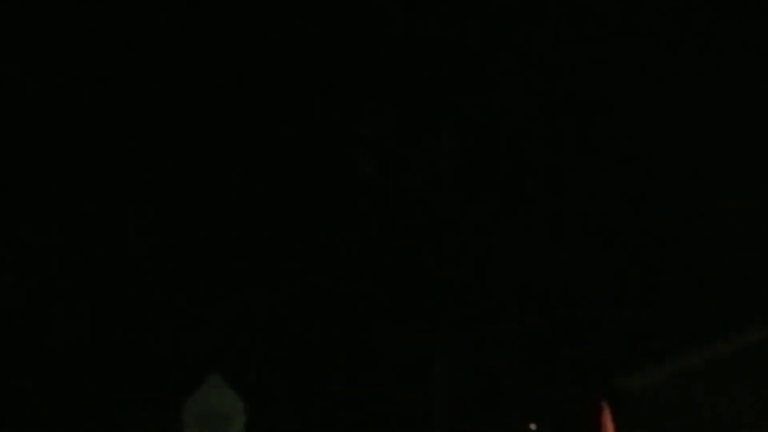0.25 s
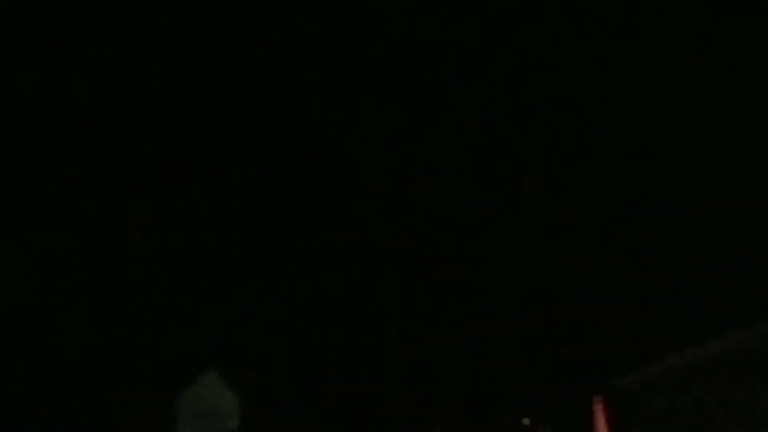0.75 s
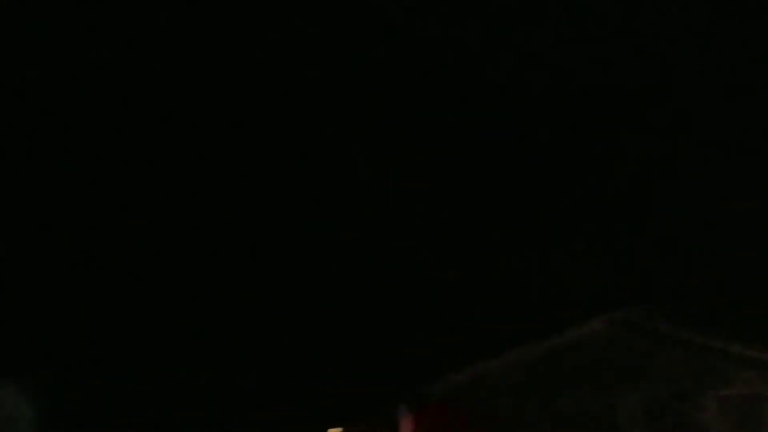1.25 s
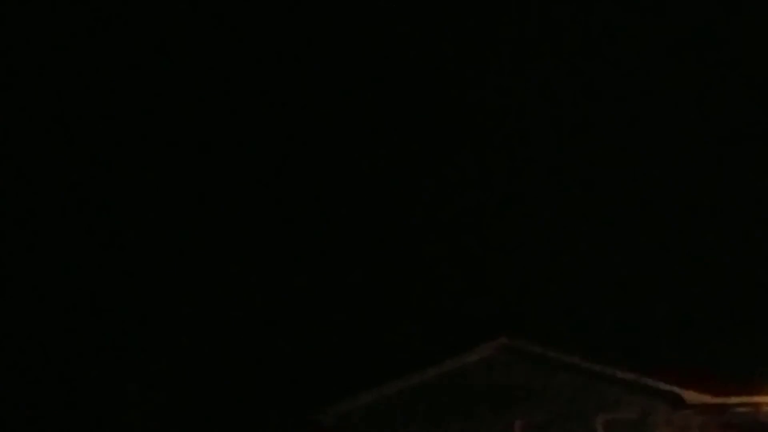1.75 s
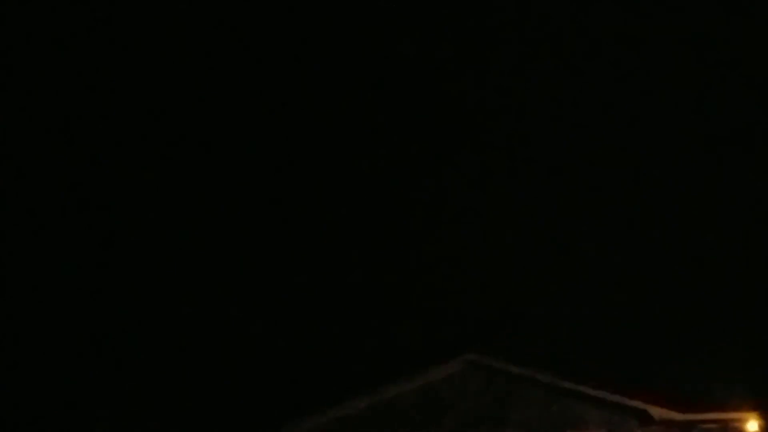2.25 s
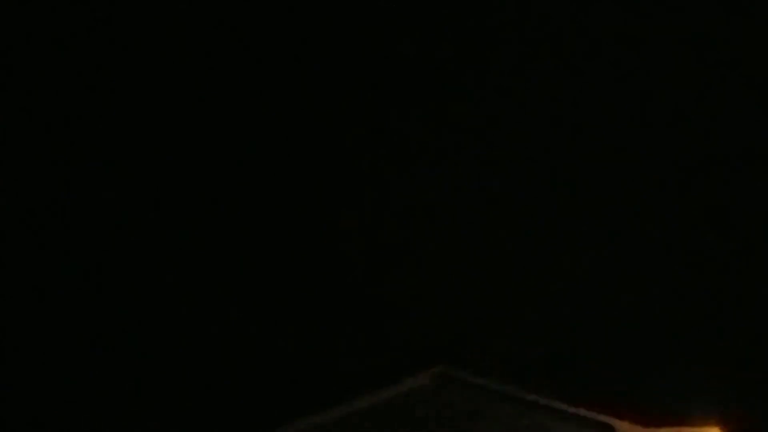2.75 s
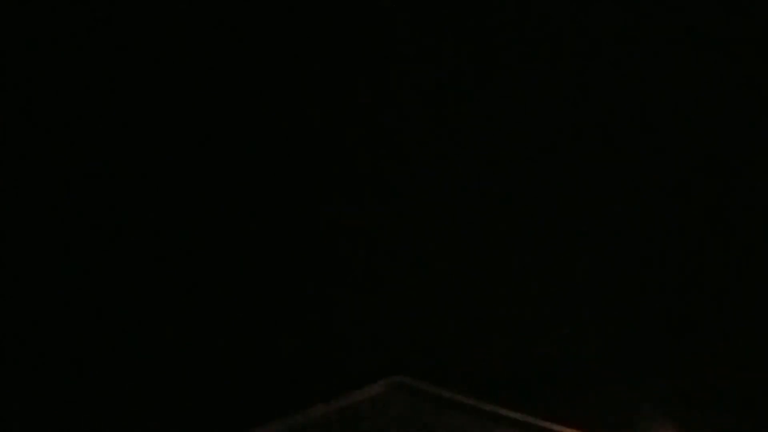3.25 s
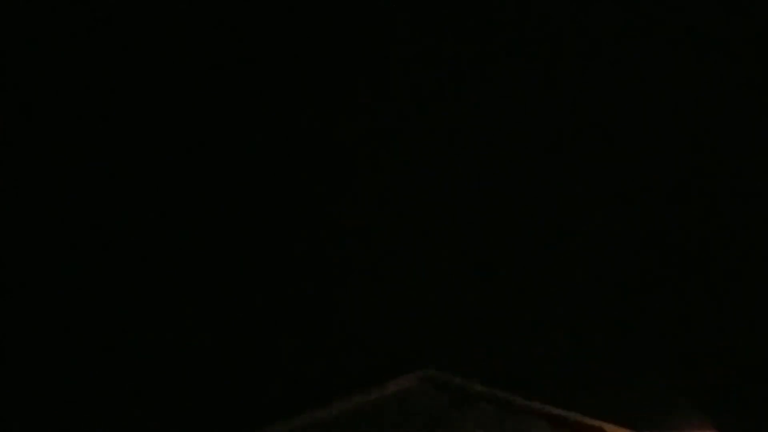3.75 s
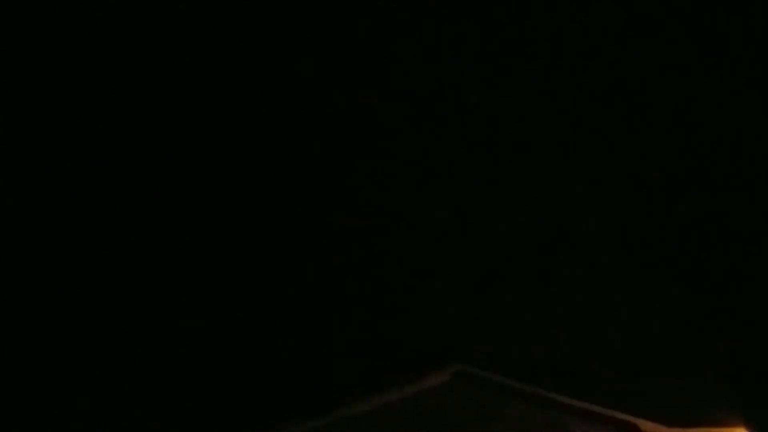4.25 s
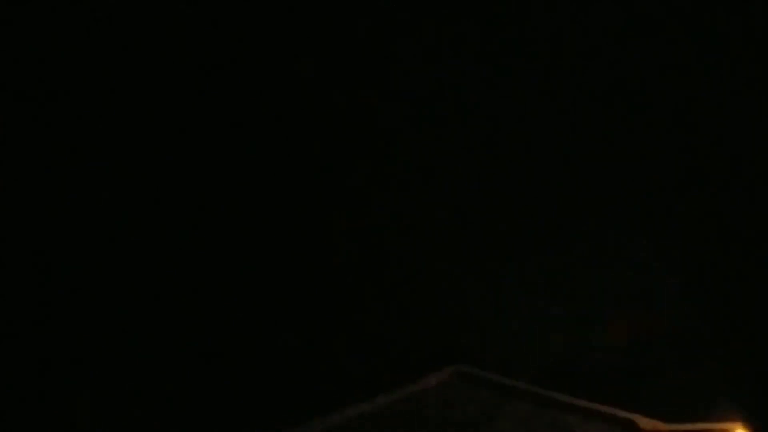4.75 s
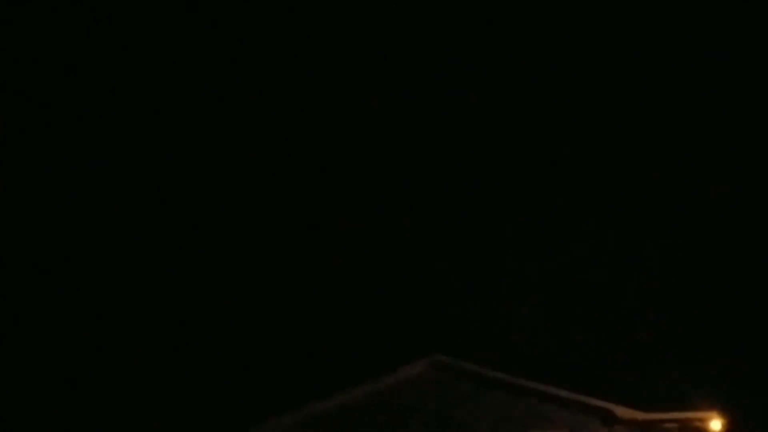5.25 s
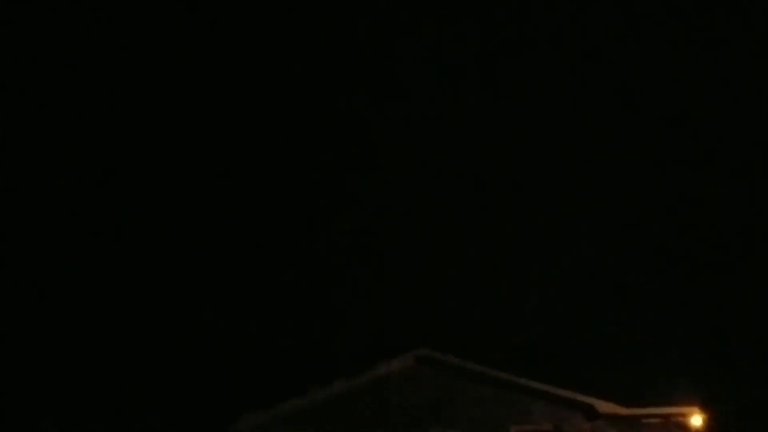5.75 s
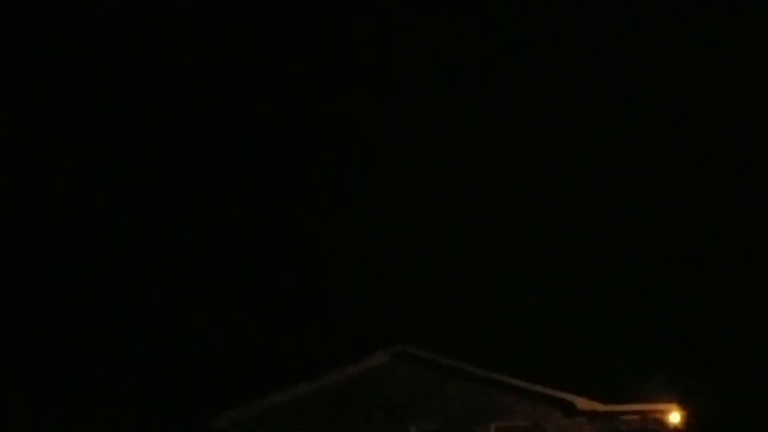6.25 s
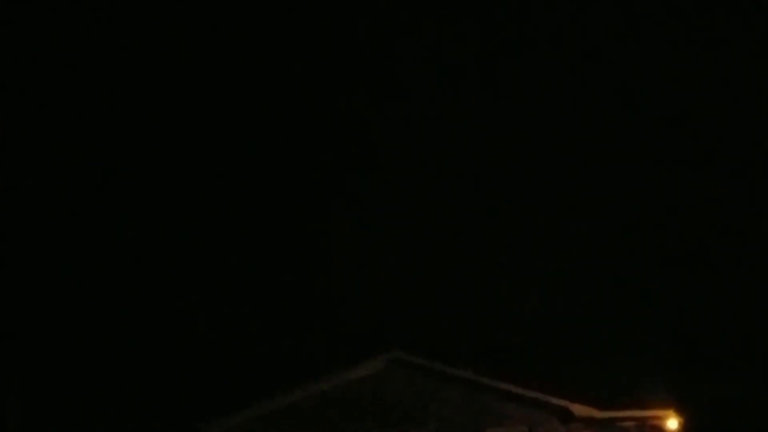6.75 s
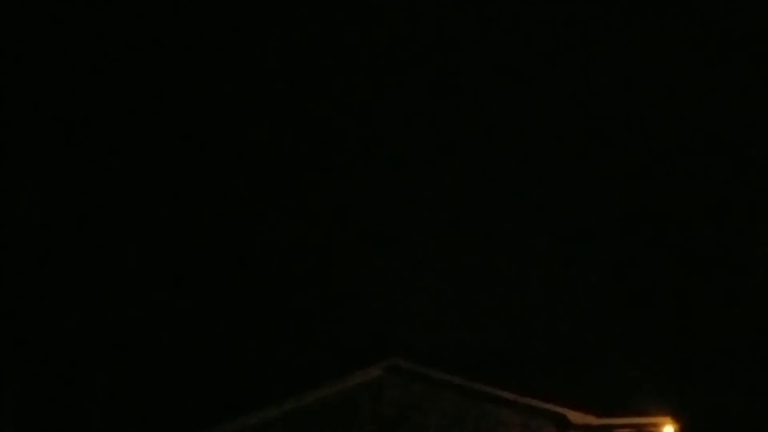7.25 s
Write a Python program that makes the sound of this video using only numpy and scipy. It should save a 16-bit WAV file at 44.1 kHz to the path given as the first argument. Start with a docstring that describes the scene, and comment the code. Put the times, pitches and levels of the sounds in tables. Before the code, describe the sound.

Night crickets whine over a low town hum, then two sharp, deafening bangs crack and roll off between houses, the second trailed by a hiss.

```python
"""Over the roofs of a town on a summer night: two sharp bangs, heard by two spaced microphones.
Each bang is a train of N-shaped pressure fronts; its echoes are grainy noise rolling off between the houses.
A hissing rush of grainy noise follows the second. Crickets and other insects, made of pulsed tones and
trilling noise bands, whine above the town's noise rumble and wavering hum.
The recorder's gain control ducks after each bang."""
import sys
import numpy as np
from scipy import signal
from scipy.fft import rfft, irfft, next_fast_len
from scipy.io import wavfile
from scipy.ndimage import uniform_filter1d, minimum_filter1d, map_coordinates

SR = 44100
rng = np.random.default_rng(int(sys.argv[2]) if len(sys.argv) > 2 else 0)


def generate_wav(sig):
    """Save sig (samples, or channels by samples) to the path in sys.argv[1] as 16-bit PCM at SR."""
    pcm = np.round(np.clip(np.atleast_2d(sig).T, -1, 1) * 32767).astype(np.int16)
    wavfile.write(sys.argv[1], SR, pcm)


N = 331191
T = np.arange(N) / SR
SIZE = 2 * next_fast_len(N // 2 + 1, True)
HZ = np.maximum(np.fft.rfftfreq(SIZE, 1 / SR), 1)
SPACING_M = 0.13   # between the microphones

# level of the town's bass rumble, in two spans: time_s [s], level_db [dB]
RUMBLE_LEVEL = [
    [(0.0, -43.5), (0.35, -50), (0.4, -43.5), (1.05, -45), (2.66, -42), (2.75, -48), (3.58, -43),
     (3.6, -45)],
    [(6.7, -44.5), (6.784, -40.5), (6.932, -46), (7.024, -40), (7.044, -44), (7.272, -42.5), (7.302, -47.5),
     (7.5, -41.5)],
]
# colour of the town's noise: pitch_hz [Hz], level_db [dB per Hz, relative]
TOWN_COLOUR = [(25, -11), (60, -6.5), (100, 1.5), (150, -3.5), (250, -14), (450, -23.5), (1100, -27.5),
               (1700, -36), (3800, -48.5), (5500, -58.5), (6200, -41), (7500, -45.5), (8200, -66.5),
               (9300, -48), (15000, -53)]
# wavering machine tones: pitch_hz [Hz], width_hz [Hz, nominal], level_db [dB, relative]
HUMS = [(119.55, 2.86, 0.5), (209.5, 3.6, -10), (236.1, 5.7, -13), (301, 6.7, -26.5), (960, 5, -53),
        (998, 0.77, -20.5)]
# a drone near 334 Hz: time_s [s], level_db [dB]
PASSING_TONE = [(0, -69), (.5, -63.5), (1.5, -59), (2.0, -62), (2.6, -85)]
# insect choirs, two low, then middle, high and top:
# pitch_hz [Hz], width_hz [Hz, nominal], trills_per_s [1/s], trill_depth [0-1]
CHOIR_VOICES = [(2530, 760, 110, 0.07), (2803, 460, 120, 0.1), (4722, 420, 93, 0.18), (11240, 920, 74, .1),
                (14300, 4100, 44, .08)]
# bouts of the high choir, at full level: start_s [s], length_s [s], level_db [dB]
HIGH_BOUTS = [(0.0, 0.2, -75), (.3, 0.23, -78), (.95, .8, -74), (1.9, 0.16, -77), (3.0, 0.35, -80),
              (4.402, 0.37, -79), (5.6, 1.9, -74.5)]
# pitches of the cricket chorus: pitch_hz [Hz], level_db [dB per Hz, relative]
CRICKET_BAND = [(6200, -45), (6500, -10), (6750, 6.5), (6950, 12), (7100, 10), (7400, 4), (7600, -48),
                (7800, -74)]
# beat of the chorus, quicker after the first bang: time_s [s], chirps so far [count]
CHIRP_PACE = [(0.005, 0), (3.98, 15), (7.73, 30)]
# the crickets falter after the bangs: # time_s [s], chorus_db [dB], high_singer_db of a singer near 14.65 kHz
# [dB]
CRICKET_LEVELS = [(0.02, -57.5, -84), (.27, -56.5, -84), (1.3, -58, -84), (1.7, -57.5, -79),
                  (3.6, -56, -78), (3.95, -62, -86), (4.5, -60, -84), (5.0, -59, -84), (6.2, -60.5, -75),
                  (6.6, -60, -76.5), (7.5, -57.5, -74)]
# the nearest cricket keeps its own time: middle_s [s], overtone_db [dB]
NEAR_CHIRPS = [(.185, -63), (.46, -68), (.81, -61), (1.08, -62), (1.345, -65), (1.62, -72), (1.91, -72),
               (2.13, -71), (2.375, -72), (2.67, -74), (2.93, -67), (3.18, -73), (3.42, -74), (3.66, -72)]
# the bangs: start_s [s], level_db [dB], bluntness [factor on the rise times]
BANGS = [(3.6596, -3, 0.41), (4.8216, -3, 1.3)]
# direct path and reflections off the same walls: delay_ms [ms], peak_db [dB, added to the bang's level],
# length_ms [ms, scale of the front], rise_ms [ms, before bluntness], left_lag_ms [ms]
PATHS = [(0, 3, 3.7, .45, .3), (5.0, -2, 4.2, .6, 0.02), (6.6, -8, 2.5, .3, .3), (9.3, -6, 2.2, .4, -.2),
         (13.8, -3, 4.4, .9, 0.07), (19.5, -4, 5.5, 1.0, .1), (28.6, -5, 4.0, .8, 0.02),
         (38, -9, 4.0, .8, .1), (84.5, -12, 3.0, .4, -.3), (122.5, -13, 1.8, .3, -.3),
         (155.5, -16, 1.8, .3, -.3)]
# ringing of the space before the microphones: pitch_hz [Hz], width_hz [Hz], level_db [dB]
YARD = [(950, 250, -4), (2100, 600, 2)]
# colour of the first and second roll: pitch_hz [Hz], level_db [dB per Hz, relative]
ROLL_COLOURS = [
    [(24, -44), (40, -15), (98, -1.5), (188, -1.5), (274, -1.5), (318, -5), (475, -19), (641, -3),
     (887, -17), (1260, -15), (1620, -21), (1880, -20), (5100, -51), (7420, -60.5), (15700, -66.5)],
    [(24, -44), (40, -20.5), (120, -1.5), (162, -4), (193, -0.5), (343, -6.5), (440, -18), (657, -8.5),
     (1140, -22), (1290, -18), (2240, -25), (3020, -36.5), (6390, -56.5), (7240, -60.5), (15700, -64.5)],
]
# echoes from further off, alike for both bangs: delay_s after the bang [s], level_db [dB],
# tilt_db [dB per octave from 250 Hz, at most 3 octaves up], treble_db [dB, added to the treble bands]
ROLL = [(0.001, -7, 0, 1.5), (.045, -8, -1.77, 5.5), (.09, -13, 0, 2.5), (.13, -15, -0.2, 3),
        (.17, -16.5, -0.9, 3.5), (.28, -23.5, -0.45, 4), (.42, -29, 0.46, -2), (.6, -35, -2.5, 6),
        (.76, -33, -1, -3), (1.0, -42.5, 0.2, -7), (1.4, -40, -2, 5), (2.2, -46, -2, -11)]
# colour of the hissing rush: pitch_hz [Hz], level_db [dB per Hz, relative]
RUSH_COLOUR = [(300, -4), (700, 4), (1000, 2.5), (1500, -2.5), (2100, 3), (2500, -1), (3000, -9),
               (4500, -21), (6500, -34), (9000, -64)]
# difference between the microphones: pitch_hz [Hz], left_minus_right_db [dB]
BALANCE = [(60, -1.5), (400, -1), (1300, -1.5), (4400, -0.5), (8000, 0.5), (15000, 0.5)]


def amp(db):
    """Turn dB into gain."""
    return 10 ** (np.asarray(db) / 20)


def in_time(*tables):
    """Join the columns of (time_s, ...) rows by straight lines, one value a sample."""
    s, *columns = np.transpose(np.vstack(tables))
    return [np.interp(T, s, column) for column in columns]


def at_hz(points):
    """Spread a (pitch_hz, level_db) table over the frequency grid, straight in log frequency."""
    hz, db = np.transpose(points)
    return np.interp(np.log(HZ), np.log(hz), db)


def peak(hz, width_hz):
    """Gain of a resonance applied twice."""
    return 1 / (1 + (2 * (HZ - hz) / (0.96 * width_hz)) ** 2)


def diffuse(gain, grain_db=0, lag_ms=0, spread=1):
    """Spectrum of noise from all around (spread 1) or a narrower side at both microphones, mid rms 1."""
    noise = rng.standard_normal((2, SIZE))
    if grain_db:
        noise = noise * amp(grain_db * rng.standard_normal(SIZE))   # uneven grains
    a, b = rfft(noise)
    # two points in a diffuse field are alike in the bass only
    alike = np.sinc(2 * HZ * spread * SPACING_M / 343)
    mid = np.sqrt(1 + alike) * a
    side = np.sqrt(1 - alike) * b
    left_delay = np.exp(-2j * np.pi * HZ * lag_ms / 1000)
    pair = gain * np.array([(mid + side) * left_delay, mid - side])
    mid_rms = np.sqrt(2 * np.sum(abs(pair.mean(axis=0)) ** 2)) / SIZE
    return pair / mid_rms


def wave(spectrum):
    """Turn a spectrum back into samples."""
    return irfft(spectrum)[..., :N]


def drift(per_s):
    """Slow chance: random steps of spread 1 joined smoothly."""
    steps = rng.standard_normal(int(N / SR * per_s) + 3)
    return map_coordinates(steps, [T[::64] * per_s], order=2).repeat(64)[:N]


def town():
    """Broad noise whose bass rumble swells while the air hiss only wavers, and machine tones."""
    air = diffuse(amp(at_hz(TOWN_COLOUR)), lag_ms=0.18, spread=0.8)
    bass = 1 / (1 + (HZ / 500) ** 2)
    rumble_db = in_time(RUMBLE_LEVEL)[0] if np.ndim(RUMBLE_LEVEL[0]) == 1 else in_time(*RUMBLE_LEVEL)[0]
    rumble = amp(rumble_db + 1.8 * drift(14)) * wave(air * bass)
    hiss = amp(-37.5 + 1.1 * drift(5.5)) * wave(air * (1 - bass))

    tones = sum(amp(level_db) * peak(hz, width_hz) for hz, width_hz, level_db in HUMS)
    hums = amp(-49) * wave(diffuse(tones, lag_ms=0.18, spread=0.5))
    drone = amp(in_time(PASSING_TONE)[0]) * wave(diffuse(peak(333.8, 12.5), lag_ms=0.088))
    # the part of the hum that is steadiest in pitch
    steady_hum = amp(-52.5 + 2.0 * drift(3.54)) * np.sin(2 * np.pi * 119.5 * T)
    return rumble + hiss + hums + drone + steady_hum


def choirs():
    """Many insects of a kind blur into a trilling band of noise; the low choir throbs on two pitches."""
    edge_s = 0.055   # fade before and after each bout
    bouts = np.zeros(N)
    for s, length_s, db in HIGH_BOUTS:
        inside_s = np.minimum(T - s, s + length_s - T)
        bouts += amp(db) * np.clip(inside_s / edge_s + 1, 0, 1)
    throbs_per_s, throb_db = 8, 2.43
    gains = [
        amp(-60.5 + throb_db * drift(throbs_per_s)),
        amp(-61 + throb_db * drift(throbs_per_s)),
        amp(-68.5 + 0.27 * drift(8)),
        bouts * amp(0.55 * drift(10)),
        amp(-73.5 + 1.5 * drift(7)),
    ]
    out = 0
    for (hz, width_hz, per_s, depth), gain in zip(CHOIR_VOICES, gains):
        trill = 1 + depth * np.sin(2 * np.pi * per_s * T)
        out = out + gain * trill * wave(diffuse(peak(hz, width_hz), lag_ms=0.18, spread=0.35))
    return out


def crickets():
    """Chirps roughly in step blur into a swelling band; a high singer near 14.65 kHz chirps on the same beat
    and stands out."""
    jitter_s, spread_db, pulses_per_s = 0.019, -0.4, 43
    chorus_db, high_singer_db = in_time(CRICKET_LEVELS)
    swell = amp(-7.5 + 0.8 * drift(6.5))   # stragglers between the chirps
    high_singer = np.zeros(N)
    beat_s, chirps = np.transpose(CHIRP_PACE)
    chance = rng.standard_normal((int(chirps[-1]), 3))
    starts_s = np.interp(np.arange(len(chance)), chirps, beat_s)
    for s, (late, loud, near) in zip(starts_s, chance):
        t = T - s - jitter_s * late
        now = slice(*np.searchsorted(t, [-0.25, 0.25]))
        t = t[now]
        pulses = np.cos(np.pi * pulses_per_s * t) ** 2
        swell[now] += amp(spread_db * loud) * (1 - 0.37 * pulses) * np.exp(-abs(t / 0.1) ** 3)
        high_singer[now] += amp(spread_db * near) * (1 - 0.5 * pulses) * np.exp(-(t / 0.06) ** 4)
    band = wave(diffuse(amp(at_hz(CRICKET_BAND)), lag_ms=0.186, spread=0.46))
    band = band * [[1.0], [-1.0]]   # the right side is turned over in polarity
    highest = wave(diffuse(peak(14650, 130)))
    return amp(chorus_db) * swell * band + amp(high_singer_db) * high_singer * highest


def near_cricket():
    """Four clean pulses a chirp, on a keynote and its octave."""
    pulses_per_s, half_s = 38, 0.05   # half_s: half the length of a chirp
    gate = np.zeros(N)
    for s, db in NEAR_CHIRPS:
        now = slice(*np.searchsorted(T - s, [-0.1, 0.1]))
        t = T[now] - s
        pulses = 1 - 0.75 * np.cos(np.pi * pulses_per_s * t) ** 2
        gate[now] += amp(db) * pulses * np.exp(-(t / half_s) ** 6)
    phase = 2 * np.pi * np.cumsum(6980 + 12 * drift(55)) / SR   # keynote and its waver in Hz
    song = gate * (amp(6) * np.sin(phase) + np.sin(2 * phase))
    return np.array([np.roll(song, 6), song])   # the left hears it a little later


def shocks():
    """N-shaped pressure fronts: a jump up, a slide to suction, a slower return."""
    out = np.zeros((2, N))
    t_ms = np.arange(800) / SR * 1000
    for s, bang_db, blunt in BANGS:
        for delay_ms, peak_db, length_ms, rise_ms, left_lag_ms in PATHS:
            corners_ms = [0, blunt * rise_ms, 0.35 * length_ms, 0.8 * length_ms, 1.25 * length_ms]
            at = round((s + (delay_ms - 1) / 1000) * SR)   # 1 ms early, to leave room for the lag
            for side, late_ms in enumerate((1 + left_lag_ms, 1)):
                front = np.interp(t_ms - late_ms, corners_ms, [0, 1, 0.1, -1.15, 0])
                out[side, at:at + len(t_ms)] += amp(bang_db + peak_db) * front
    for hz, width_hz, ring_db in YARD:
        out = out + amp(ring_db) * signal.lfilter(*signal.iirpeak(hz, hz / width_hz, fs=SR), out)
    # air rounds the fronts, the deepest bass is lost
    return signal.sosfilt(signal.butter(2, [40, 5000], "band", fs=SR, output="sos"), out)


def roll():
    """Countless small echoes off the far side blur into grainy noise whose colour shifts as it fades."""
    lumps_per_s, lumps_db = 45, 1.1   # the roll comes in uneven lumps, band by band
    out = np.zeros((2, N))
    level_db, tilt_db, treble_db = in_time(ROLL)   # here time runs from the bang
    gone_s = ROLL[-1][0]
    size = int(gone_s * SR)
    for colour, (s, bang_db, _) in zip(ROLL_COLOURS, BANGS):
        echoes = diffuse(amp(at_hz(colour)), grain_db=6.5, lag_ms=-0.26, spread=0.55)
        at = round(s * SR)
        for octave in range(-2, 7, 2):   # overlapping bands, counted from 250 Hz
            share = np.clip(1 - abs(np.log2(HZ / 250) - octave) / 2, 0, 1)
            band_db = bang_db + level_db + tilt_db * min(octave, 3) + treble_db * (octave > 3)
            band_db = band_db + lumps_db * drift(lumps_per_s)
            # the treble tears at once, the bass builds up after the first fronts
            builds_s = 0.066 if octave < 1 else 0.012 if octave < 3 else 0.002
            fade = np.interp(T, [0.001, builds_s, gone_s - 0.3, gone_s], [0, 1, 1, 0])
            band = amp(band_db) * fade * wave(echoes * share)
            out[:, at:at + size] += band[:, :size]
    return out


def rush():
    """A grainy hiss swells, holds and fades, its level flickering."""
    peak_s, peak_db, hold_s = 5.583, -36.5, 0.13
    rise_db_per_s, fall_db_per_s = 55, 64
    t = T - peak_s
    rise_db = rise_db_per_s * np.minimum(t, 0)
    fall_db = fall_db_per_s * np.maximum(t - hold_s, 0)
    level_db = peak_db + rise_db - fall_db + 1.4 * drift(40)
    return amp(level_db) * wave(diffuse(amp(at_hz(RUSH_COLOUR)), grain_db=7.0, lag_ms=-0.2))


def scene():
    """All sources at the two microphones, which differ a little in colour."""
    sound = town() + choirs() + crickets() + near_cricket() + shocks() + roll() + rush()
    return wave(rfft(sound, SIZE) * amp(at_hz(BALANCE) / 2 * [[1], [-1]]))


def record(dry):
    """Gain control ducks on loud sound, holds and creeps back; peaks are rounded, deep bass and top cut."""
    power = uniform_filter1d(np.mean(dry ** 2, axis=0), size=1024)
    level_db = 10 * np.log10(power + 1e-12)
    wanted_db = 0.26 * np.maximum(level_db + 28, 0)   # cut per dB above -28 dB
    hold = round(0.4 * SR)
    # the largest cut wanted in the hold time just past
    held_db = -minimum_filter1d(-wanted_db, size=2 * (hold // 2) + 1, origin=hold // 2)
    release_db = 9 * T   # 9 dB per s
    cut_db = np.maximum.accumulate(held_db + release_db) - release_db
    r = np.exp(-1 / (0.06 * SR))   # the cut is smoothed over 60 ms
    ducked = dry * amp(-signal.lfilter([1 - r], [1, -r], cut_db))
    ducked = signal.sosfilt(signal.butter(2, 45, "high", fs=SR, output="sos"), ducked)
    top = 0.99   # ceiling of the rounded peaks
    rounded = ducked / (1 + abs(ducked / top) ** 6) ** (1 / 6)
    return signal.sosfilt(signal.ellip(12, 0.5, 70, 15720, fs=SR, output="sos"), rounded)


dry = scene()
out = record(dry)
generate_wav(out)
```